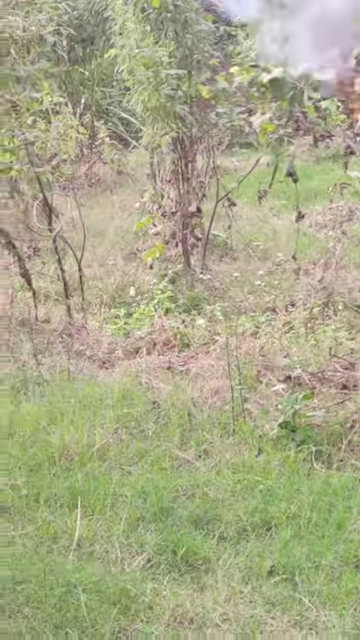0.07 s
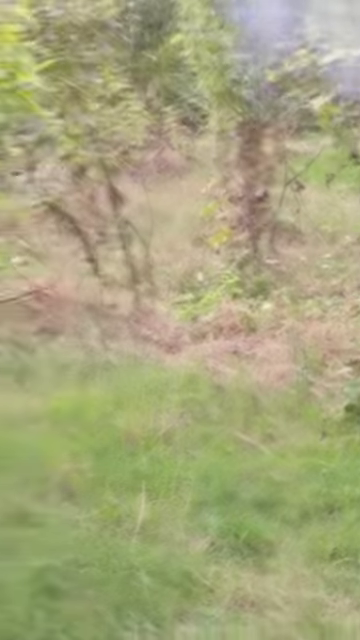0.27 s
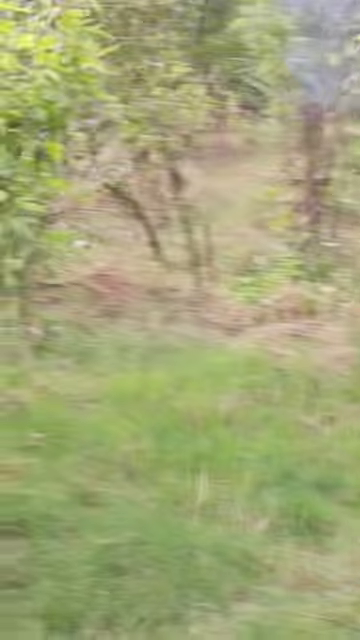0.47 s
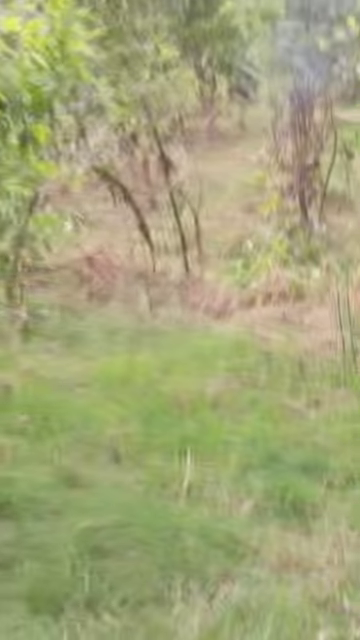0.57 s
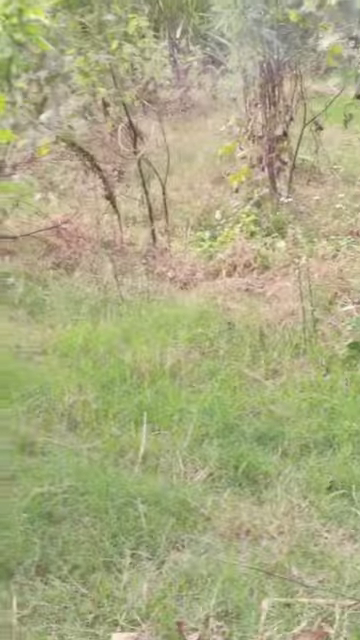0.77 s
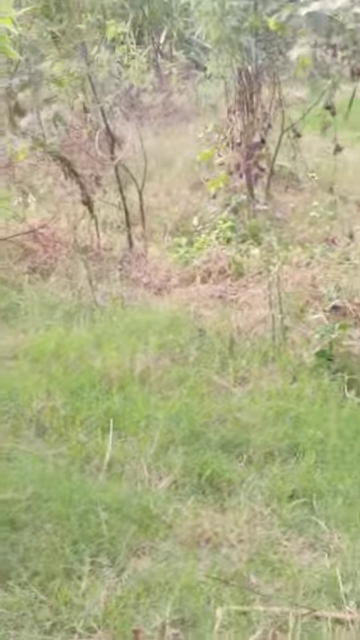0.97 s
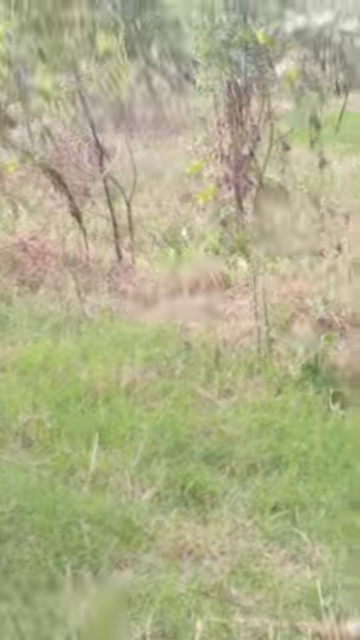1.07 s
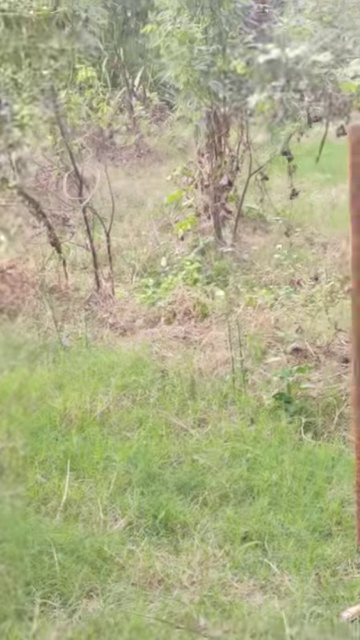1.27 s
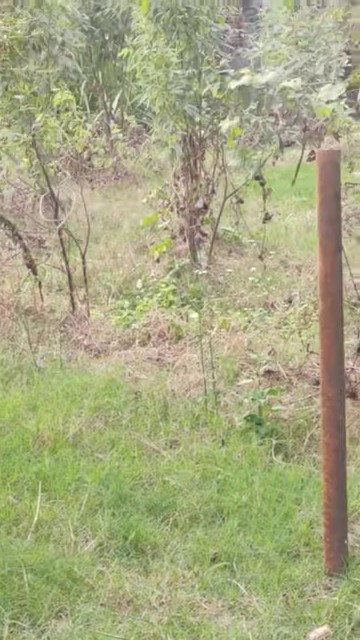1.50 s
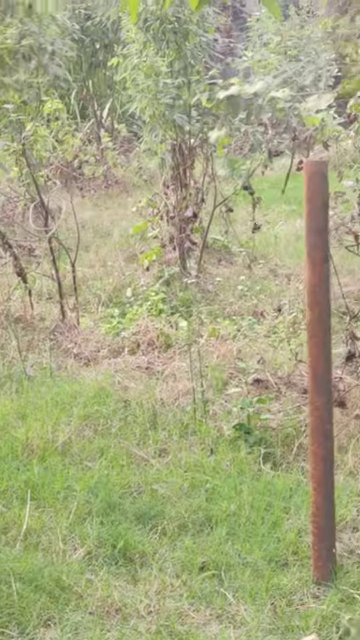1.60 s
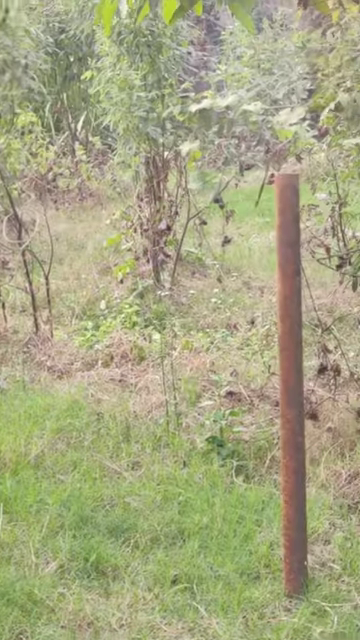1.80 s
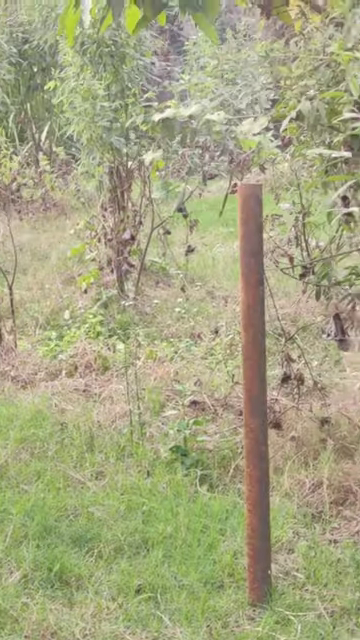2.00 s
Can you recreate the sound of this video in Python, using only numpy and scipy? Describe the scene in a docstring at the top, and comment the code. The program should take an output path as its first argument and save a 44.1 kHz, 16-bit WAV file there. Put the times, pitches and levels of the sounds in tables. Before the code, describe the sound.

A steel pipe cannon fires once in an overgrown plot, overloading the microphone. Quick echoes slap back and a low boom rolls away, while the pipe rings and bits of debris patter lightly through leaves.

```python
"""Pipe cannon in an overgrown plot

A steel pipe cannon fires and overloads the microphone. Echoes slap back from near and far,
a low boom rolls on, and the pipe rings in beating pairs of modes. Bits of debris patter down
through the leaves, over quiet outdoor air and one faint chirp."""
import sys
import numpy as np
from scipy import signal
from scipy.fft import rfft, irfft
from scipy.io import wavfile
from scipy.ndimage import uniform_filter1d

SR = 44100
rng = np.random.default_rng(int(sys.argv[2]) if len(sys.argv) > 2 else 0)


def bounce(signal):
    """Save signal as a 16-bit WAV file at the path given by the first command-line argument."""
    frames = np.transpose(np.atleast_2d(signal))
    limited = np.clip(frames, -1, 1)
    pcm = np.round(limited * 32767).astype(np.int16)
    wavfile.write(sys.argv[1], SR, pcm)


N = 90404
T, HZ = np.arange(N) / SR, np.fft.rfftfreq(N, 1 / SR)
FIRE_S = 0.2358


def amp(db):
    """Decibels to gain."""
    return 10 ** (np.asarray(db) / 20)


def unit(x):
    """Scales to an rms of one."""
    return x / np.sqrt(np.mean(x ** 2) + 1e-20)


def curve_at(points, hz):
    """Reads a curve on a log-frequency axis."""
    freqs, values = np.transpose(points)
    return np.interp(np.log(hz + 1), np.log(freqs + 1), values)


def eq(points):
    """Gain across the spectrum from an EQ curve in dB."""
    return amp(curve_at(points, HZ))


def band(centre_hz, octaves):
    """A bell of gain around one frequency."""
    return np.exp(-.5 * (np.log2((HZ + 1) / centre_hz) / octaves) ** 2)


def pan(left_db):
    """Stereo gains that put the left channel left_db above the right."""
    return amp(np.array([[left_db], [-left_db]]) / 2)


def swell(peak_s, half_width_s):
    """A bell-shaped fade in and out."""
    return np.exp(-((T - peak_s) / half_width_s) ** 2 / 2)


def wander(seconds):
    """A smooth random wobble of rms one."""
    window = np.hanning(int(2 * seconds * SR) + 3)
    return unit(signal.fftconvolve(rng.standard_normal(N), window, "same"))


def steady(x, window_s):
    """Rides the gain to even out swells longer than the window."""
    power = uniform_filter1d((x ** 2).mean(0), int(window_s * SR))
    return x / np.sqrt(abs(power) + 1e-9)


def die_away(x, start_s, decay_curve, bands=14):
    """From start_s on, each band decays at its own speed."""
    centres, spectrum = np.geomspace(60, 16000, bands), rfft(x)
    age, out = np.maximum(T - start_s, 0), np.zeros((2, N))
    for hz, solo in zip(centres, np.eye(bands)):
        part = irfft(spectrum * np.interp(HZ, centres, solo), N)
        out += part * amp(-60 * age / curve_at(decay_curve, hz))
    return out


# Left-right tint of the microphone pair: freq_hz, left_over_right_db
MIC_BALANCE = [(60, 0.5), (300, 0.5), (2000, .5), (5500, -4), (8200, 6), (10000, -0.5), (12500, -1),
               (16000, -12)]
def colour(x, gain):
    """Filters a stereo signal, adds each microphone's tint and scales to an rms of one."""
    side_db = curve_at(MIC_BALANCE, HZ) / 2
    return unit(irfft(rfft(x) * gain * amp([side_db, -side_db]), N))


# How alike the two microphones sound: freq_hz, correlation
MIC_LIKENESS = [(50, .985), (150, .96), (500, .89), (1100, .6), (2200, .25), (4000, 0), (16000, 0)]
def noise(gain):
    """Coloured stereo noise, nearly mono in the bass and wide in the treble."""
    mid, side = rfft(rng.standard_normal((2, N)))
    likeness = curve_at(MIC_LIKENESS, HZ)
    mid, side = mid * np.sqrt(1 + likeness), side * np.sqrt(1 - likeness)
    return colour(irfft([mid + side, mid - side], N), gain)


# Tone of the outdoor bed: freq_hz, relative_db
AIR_EQ = [(12, -10), (20, 20.5), (142, -10.5), (270, -6), (357, -1.5), (698, -15), (1190, -17.5),
          (2750, -17.5), (3070, -19.5), (4420, -19), (6010, -19.5), (7310, -15), (16000, -30.5)]
def air(level_db=-48.5):
    """A quiet bed of outdoor air, mostly low rumble."""
    return amp(level_db) * noise(eq(AIR_EQ))


def chirp(peak_s=1.9, half_width_s=0.011, pitch_hz=6300, rise_hz_per_s=4000, level_db=-60):
    """One faint rising chirp, like a distant bird."""
    glide_hz = pitch_hz + rise_hz_per_s * (T - peak_s)
    return amp(level_db) * swell(peak_s, half_width_s) * np.sin(2 * np.pi * np.cumsum(glide_hz) / SR)


# Showers of grit: peak_s, level_db, half_width_s
GRIT_SHOWERS = [(1.036, -41, 0.056), (1.25, -49.5, 0.078)]
# Tone of grit on leaves: freq_hz, relative_db
GRIT_EQ = [(1000, 4), (4000, -2.5), (8000, 1.5), (11000, -6), (16000, -5)]
def grit(grains_per_s=14000, spread_db=2):
    """Fine grit sprinkles through the leaves in showers of tiny clicks."""
    grains = rng.standard_normal((2, N)) * (rng.random((2, N)) < grains_per_s / SR)
    grains *= amp(spread_db * np.minimum(rng.exponential(1, (2, N)), 4))
    envelope = sum(amp(db) * swell(peak_s, half_s) for peak_s, db, half_s in GRIT_SHOWERS)
    return envelope * colour(grains, eq(GRIT_EQ))


# Bits of debris landing: start_s, level_db, pan_left_db, centre_hz
DEBRIS_HITS = [(.828, -42, -7, 11000), (0.8552, -31.5, -5, 6760), (.872, -33.5, 3, 6000),
               (1.02, -42, -11, 5500), (1.035, -36, -12, 7860), (1.124, -36, -9, 4700),
               (1.181, -42.5, -7, 7000), (1.236, -38, 7.5, 7400), (1.246, -48, 6, 10900),
               (1.258, -40, 10, 9000), (1.286, -43, 5, 6500), (1.4821, -46, -6, 7000),
               (1.5025, -43.5, 15, 8800), (1.532, -39, 6, 6950), (1.619, -39, 2, 9900),
               (1.8027, -46, 0, 6000), (1.887, -52, -5, 7500)]
def debris(tick_s=0.00088, rustle_s=0.014, rustle_db=-14.5):
    """Single bits tick on leaves, which rustle briefly."""
    out = np.zeros((2, N))
    for start_s, level_db, left_db, centre_hz in DEBRIS_HITS:
        age = np.maximum(T - start_s, 0)
        envelope = (T >= start_s) * (np.exp(-age / tick_s) + amp(rustle_db) * np.exp(-age / rustle_s))
        out += pan(left_db) * amp(level_db) * envelope * noise(band(centre_hz, octaves=1))
    return out


# Tone of the last distant echo: freq_hz, relative_db
FAR_ECHO_EQ = [(100, -2), (200, -2), (260, -5), (330, -1), (440, -6.5), (570, 4.5), (700, -26), (950, -17),
               (1150, -4.5), (1500, -16), (4000, -47)]
def far_echo(level_db=-50.5):
    """The bang comes back from far away, faint, dull and smeared."""
    return amp(level_db) * swell(peak_s=1.72, half_width_s=0.19) * noise(eq(FAR_ECHO_EQ))


# Tone of the echo off the trees: freq_hz, relative_db
TREE_ECHO_EQ = [(800, -20), (2000, -5), (3200, -2), (5000, -3), (8200, -4.5), (10500, -21), (16000, -17.5)]
def tree_echo(level_db=-30.5):
    """A line of trees smears the bang into a bright hiss."""
    return amp(level_db) * swell(peak_s=0.625, half_width_s=0.044) * noise(eq(TREE_ECHO_EQ))


# Tone of the rolling tail: freq_hz, relative_db
ROLL_EQ = [(60, -2), (160, -7.5), (250, -9.5), (480, 1), (1050, -3), (1700, -9.5), (2800, -20.5),
           (5000, -31), (8200, -27), (10500, -45.5), (16000, -83)]
# Decay of the tail: freq_hz, t60_s
ROLL_DECAY = [(100, 1.84), (250, 2.57), (500, 1.5), (1100, 1.64), (2200, 1.16), (5000, 1.35), (16000, 0.27)]
def roll(level_db=-16.5, attack_s=0.027, fade_from_s=0.69, flutter_db=1.43, flutter_s=0.0072):
    """Countless far echoes hold a fluttering level for about half a second, then fade."""
    attack = np.clip((T - FIRE_S) / attack_s, 0, 1)
    envelope = attack * amp(level_db + flutter_db * wander(flutter_s))
    return envelope * die_away(noise(eq(ROLL_EQ)), fade_from_s, ROLL_DECAY)


# Modes of the steel pipe: pitch_hz, level_db, t60_s, pan_left_db
PIPE_MODES = [(1304.6, -34.5, 6.45, -5.5), (1332, -28, 5.2, -4.5), (3727, -15.5, 1.03, -3),
              (3774, -19, 1.06, 1), (3850, -19, 0.92, 0)]
# Waver of the ring: freq_hz, depth_ratio
RING_WAVER = [(1300, .09), (3700, .6)]
def pipe_ring(attack_s=0.4, waver_s=0.017):
    """Close steel modes swell and beat as they ring out; the higher ones waver more."""
    age, out = np.maximum(T - FIRE_S, 0), np.zeros((2, N))
    attack = np.minimum(age / attack_s, 1) ** 2
    for pitch_hz, level_db, t60_s, left_db in PIPE_MODES:
        # complex, so both level and phase wobble
        wobble = np.array([wander(waver_s) + 1j * wander(waver_s) for channel in "LR"])
        waver = 1 + curve_at(RING_WAVER, pitch_hz) * wobble
        tone = (waver * np.exp(2j * np.pi * pitch_hz * age)).imag
        out += pan(left_db) * attack * amp(level_db - 60 * age / t60_s) * tone
    return out


# Deep pulses in the boom: peak_s, level_db, half_width_s
SUB_THROBS = [(0.634, -11.5, .025), (0.76, -5.5, 0.027), (0.836, -5, 0.013), (1.047, -27, 0.06),
              (1.25, -32, 0.034), (1.473, -42, 0.014), (1.706, -32.5, 0.029), (1.862, -38, 0.046)]
def throbs(pitch_hz=49, drift_ratio=0.049, drift_s=0.067):
    """The longest waves of the blast return as a few nearly pure, deep cycles."""
    envelope = sum(amp(db) * swell(peak_s, half_s) for peak_s, db, half_s in SUB_THROBS)
    cycles = np.cumsum(pitch_hz * (1 + drift_ratio * wander(drift_s))) / SR + rng.random()
    return envelope * np.sin(2 * np.pi * cycles)


# Rise and fall of the bass: time_s, level_db
BOOM_ENVELOPE = [(.236, -56), (.265, -18.5), (.287, -5.5), (.33, -14.5), (.41, -32), (.445, -20),
                 (.47, -6.5), (.505, -19.5), (.6, -20.5), (.635, -16), (.7, -17), (.765, -13), (.81, -26),
                 (.845, -20.5), (.895, -22), (1.03, -26), (1.16, -33.5), (1.38, -35), (1.48, -32.5),
                 (1.6, -42), (1.69, -39.5), (2.04, -45)]
# Tone of the bass: freq_hz, relative_db
BOOM_EQ = [(20, -7), (33, -22), (48, -4.5), (62, -7), (75, -7), (100, -7), (125, -17.5), (150, -12.5),
           (220, -36), (600, -107)]
def boom(attack_s=0.0033):
    """The low end of the blast comes back in waves."""
    attack = np.clip((T - FIRE_S) / attack_s, 0, 1)
    envelope = attack * amp(np.interp(T, *np.transpose(BOOM_ENVELOPE)))
    return envelope * steady(noise(eq(BOOM_EQ)), window_s=0.024)


# Distinct slaps off walls and trees: start_s, level_db, centre_hz, length_s
SLAPS = [(0.2341, -7.5, 556, 0.0088), (0.2613, 3.5, 740, 0.0051), (0.2845, 6, 580, 0.0039),
         (0.3186, 5, 1020, 0.0068), (0.338, 1.5, 1060, 0.0065), (0.346, -9.5, 148, 0.021),
         (0.356, 1.5, 1300, 0.0027), (0.36, -13, 1390, 0.027), (0.4424, -8.5, 920, 0.003),
         (0.458, -16, 756, 0.03), (0.51, -3.5, 485, 0.0045), (0.566, -19.5, 1660, 0.0065),
         (0.621, -19.5, 1080, 0.025), (0.634, -11, 530, 0.0066), (0.674, -13.5, 537, 0.039),
         (.712, -8, 530, 0.0048), (0.739, -15, 555, 0.029), (0.783, -16.5, 406, 0.028),
         (0.835, -16, 507, 0.025)]
def slapback(attack_share=0.16, skirt_db=-23.5):
    """Walls and trees return the bang as short, dull bursts; the longer ones start more softly."""
    out = np.zeros((2, N))
    for start_s, level_db, centre_hz, length_s in SLAPS:
        attack = np.clip((T - start_s) / (attack_share * length_s), 0, 1)
        envelope = amp(level_db) * attack * swell(start_s, length_s)
        tone = band(centre_hz, octaves=0.55) + amp(skirt_db) * band(centre_hz, octaves=1.7)
        out += envelope * steady(noise(tone), window_s=0.017)
    return out


# Tone of the blast and its scatter in the bushes: freq_hz, relative_db
BLAST_EQ = [(30, -40), (120, 12.5), (230, -1.5), (480, -3), (900, -5.5), (1800, -2.5), (3000, -7),
            (5500, -8.5), (8200, -4), (10500, -16.5), (16000, -7)]
# Decay of the blast: freq_hz, t60_s
BLAST_DECAY = [(100, 1), (1000, 0.31), (2200, 0.67), (4000, 0.42), (8000, 0.36), (12000, 0.34),
               (16000, 0.067)]
def blast(level_db=-2.5, hold_s=0.026):
    """The crack hits at once and scatters from the foliage; the top end dies first."""
    crack = die_away(noise(eq(BLAST_EQ)), FIRE_S + hold_s, BLAST_DECAY)
    return amp(level_db) * (T >= FIRE_S) * crack


def scene():
    """The shot and its aftermath over quiet outdoor air."""
    shot = blast() + slapback() + roll() + tree_echo() + far_echo() + boom() + throbs() + pipe_ring()
    return shot + grit() + debris() + chirp() + air()


def record(dry, knee_hardness=5.7, cutoff_hz=15900):
    """The microphone overloads, soft-clipping at full scale; a steep low-pass follows."""
    clipped = dry / (1 + abs(dry) ** knee_hardness) ** (1 / knee_hardness)
    lowpass = signal.firwin(301, cutoff_hz, window=("kaiser", 8), fs=SR)
    return signal.oaconvolve(clipped, lowpass[None], "same")


dry = scene()
out = record(dry)
bounce(out)
```